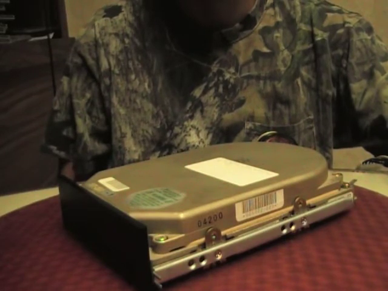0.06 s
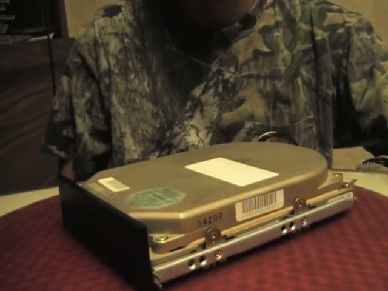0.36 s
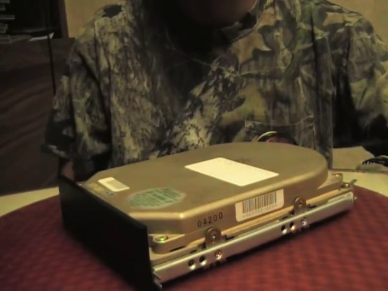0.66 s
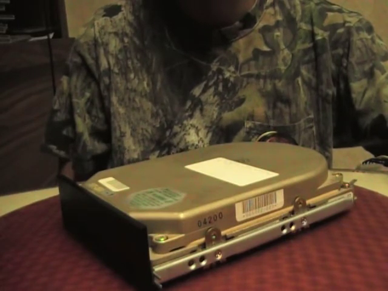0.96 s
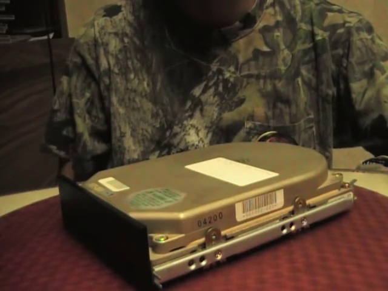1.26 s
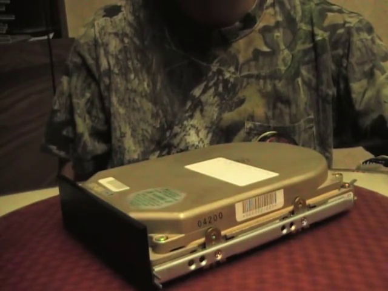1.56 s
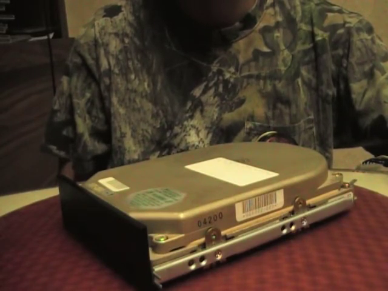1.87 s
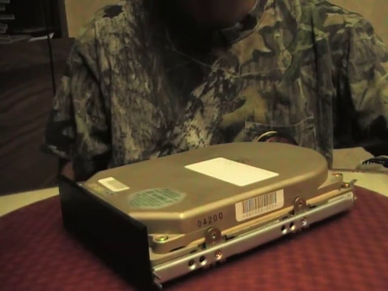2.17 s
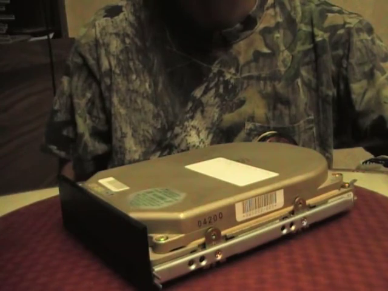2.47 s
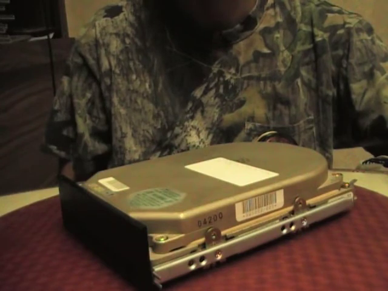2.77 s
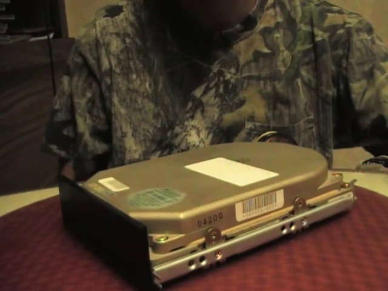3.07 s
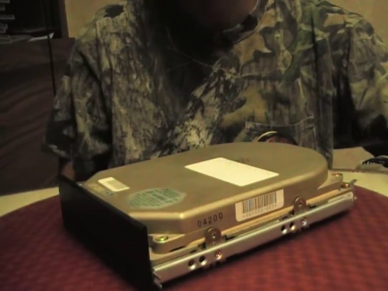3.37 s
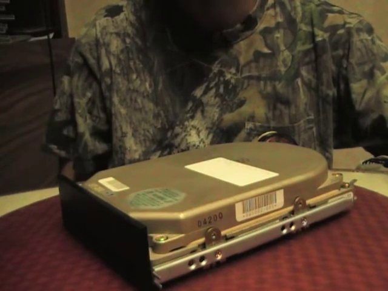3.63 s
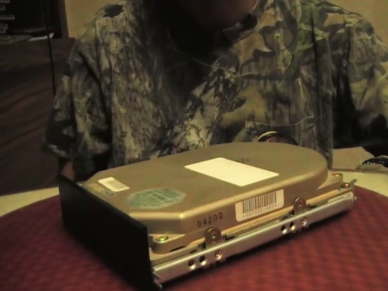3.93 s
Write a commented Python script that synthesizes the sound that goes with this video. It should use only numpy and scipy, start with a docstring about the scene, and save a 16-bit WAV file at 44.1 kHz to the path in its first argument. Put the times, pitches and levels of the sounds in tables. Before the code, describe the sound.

Close up, an old hard drive spins with a steady hum, thin bearing whine and fan noise. Its heads sweep several times with hollow knocks, then settle into fast, regular back-and-forth clicking with small whistles and rattles.

```python
"""A humming spindle, singing bearings and a rush of fan air: an old hard drive runs close by on a table. Almost
at once its stepper motor swings the heads through a few long sweeps, then shuttles them in and out in short
seeks. Each move jolts the chassis into ringing, while the motor whines and whistles, the arm rattles and the
coils sizzle. Long outward sweeps also make the arm itself thud."""
import sys
import numpy as np
from scipy import signal
from scipy.fft import rfft, irfft, next_fast_len
from scipy.io import wavfile
from scipy.ndimage import map_coordinates

SR = 44100
rng = np.random.default_rng(int(sys.argv[2]) if len(sys.argv) > 2 else 0)


def master_out(mix):
    """Clip the mix to full scale and print it as 16-bit PCM to the path in sys.argv[1]."""
    frames = np.transpose(np.atleast_2d(mix))
    ceiling = np.clip(frames, -1, 1)
    pcm = np.round(ceiling * 32767).astype(np.int16)
    wavfile.write(sys.argv[1], SR, pcm)


N = 176400


def amp(db):
    """Decibels to gain."""
    return 10 ** (np.asarray(db) / 20)


def along(points, hz):
    """Read a curve of (Hz, value) points on a log frequency axis."""
    freqs, values = np.transpose(points)
    return np.interp(np.log(hz + 1), np.log(freqs + 1), values)


def wobble(rate):
    """A smooth random curve, rate knots a second."""
    return map_coordinates(rng.standard_normal(int(N * rate / SR) + 4), [np.arange(N) * rate / SR])


def filtered(x, response):
    """EQ x with a gain that is a function of Hz."""
    size = next_fast_len(N + SR // 2)
    return irfft(rfft(x, size) * response(np.fft.rfftfreq(size, 1 / SR)), size)[..., :N]


def add(track, start, sound):
    """Mix a sound into a track at start seconds."""
    part = track[..., max(round(start * SR), 0):][..., :sound.shape[-1]]
    part += sound[..., :part.shape[-1]]


# Low hum, singing ball bearings and high motor whine. Each row: pitch in Hz, rms level in dB.
SPINDLE_HUM = [(120.1, -72), (240.2, -39.5), (360.4, -54)]
BEARING_TONES = [(1846, -60), (1879, -62), (2374, -63), (2735, -61), (2848, -60), (3316, -60), (3424, -52),
                 (3634, -63), (3741, -63), (4124, -67)]
MOTOR_WHINE = [(5766, -64), (5954, -66), (6002, -65), (6245, -58), (6304, -61), (6487, -60), (6724, -71),
               (6966, -69), (7208, -70), (7687, -75), (7865, -77), (8269, -72), (8409, -73)]
# Balls pass a flaw in the race, and the turning cage sways that rate.
# Each row: multiple of BALL_PASS_HZ, rms level in dB, phase sway in radians.
RACE_FLAW_TONES = [(4, -51, .2), (5, -55, .3), (6, -55, .8), (7, -47, 1.4), (8, -54, 1.9), (9, -52, 2.2),
                   (10, -56, .9), (11, -66, 1.2)]
BALL_PASS_HZ, CAGE_HZ = 425.3, 21.7
OVERSPEED, SETTLE_S, SPEED_WANDER = .008, .3, .00015
TONE_WAVER_DB, TONE_WIDTH = .8, .22


def spindle():
    """Hum, bearings and motor whine all follow one shaft as it settles from a slight overshoot."""
    speed = 1 + OVERSPEED * np.exp(-np.arange(N) / SR / SETTLE_S) + SPEED_WANDER * wobble(5)
    phase_per_hz = 2 * np.pi * np.cumsum(speed) / SR
    steady = [(hz, db, 0) for hz, db in [*SPINDLE_HUM, *BEARING_TONES, *MOTOR_WHINE]]
    swaying = [(k * BALL_PASS_HZ, db, sway) for k, db, sway in RACE_FLAW_TONES]
    out = np.zeros((2, N))
    for hz, db, sway in steady + swaying:
        offset, cage_offset, side_offset = rng.uniform(0, 2 * np.pi, 3)
        phase = hz * phase_per_hz + offset + sway * np.sin(CAGE_HZ * phase_per_hz + cage_offset)
        width = TONE_WIDTH * along([(3000, .25), (4000, 1.2)], hz)  # high tones spread wider
        side = width * np.sin(phase + side_offset)
        level = np.sqrt(2) * amp(db + TONE_WAVER_DB * wobble(9))
        out += level * (np.sin(phase) + np.array([side, -side]))
    return out


# Stereo image of every noise layer. Each row: frequency in Hz, left-right correlation.
NOISE_IMAGE = [(30, .8), (120, .97), (1000, .94), (2500, .98), (4000, .8), (12000, .8)]
CASE_SPACING_HZ, CASE_RIPPLE_DB = 45, 4


def case_noise(spectrum):
    """Coloured stereo noise of rms 1, its highs rippled by the case's many small resonances."""
    knots = rng.standard_normal(SR // 16)

    def mid_side_eq(hz):
        ripple_db = CASE_RIPPLE_DB * map_coordinates(knots, [hz / CASE_SPACING_HZ])
        ripple_db *= along([(900, 0), (1800, 1)], hz)
        spread = np.arccos(np.clip(along(NOISE_IMAGE, hz), -1, 1)) / 2
        return amp(along(spectrum, hz) + ripple_db) * [np.cos(spread), np.sin(spread)]

    mid, side = filtered(rng.standard_normal((2, N)), mid_side_eq)
    pair = np.array([mid + side, mid - side])
    return pair / pair.std()


# Colour of the rushing air. Each row: frequency in Hz, relative level in dB.
AIR_EQ = [(25, -22), (55, -22), (80, -12), (105, -5), (170, 1.5), (260, -2), (400, -4), (470, -1),
          (560, -5), (720, -13), (950, -5), (1170, -15), (1400, -10), (2000, -20.5), (2800, -12),
          (3800, -21), (5200, -27), (6200, -24), (7500, -30), (10300, -27.5), (12200, -32), (13300, -45),
          (15500, -58)]


def fan_air(level_db=-40.5):
    """Fan and platters stir up a steady bed of air."""
    return amp(level_db) * case_noise(AIR_EQ)


# Cues for the long sweeps. Each row: start in seconds, direction (0 out, 1 in).
SWEEP_CUES = [(.012, 0), (.099, 1), (.1785, 0), (.265, 1), (.3445, 0), (.4315, 1), (.511, 0)]
# Cues for the short round trips. Each row: inward start in seconds, outward start in seconds.
SHUTTLE_CUES = [(0.599, 0.6373), (0.6878, 0.7438), (0.7927, 0.849), (0.8941, 0.9454), (0.9914, 1.045),
                (1.0872, 1.1383), (1.1821, 1.2337), (1.2733, 1.3239), (1.3651, 1.4164), (1.4553, 1.5016),
                (1.5405, 1.5916), (1.6279, 1.674), (1.7126, 1.7612), (1.7973, 1.843), (1.8814, 1.9278),
                (1.9635, 2.0047), (2.0407, 2.0869), (2.1225, 2.1635), (2.2006, 2.2465), (2.282, 2.3227),
                (2.36, 2.4056), (2.4431, 2.4835), (2.5208, 2.5638), (2.6015, 2.6418), (2.6791, 2.72),
                (2.7598, 2.7999), (2.8393, 2.8816), (2.9238, 2.9658), (3.0075, 3.0497), (3.0923, 3.1366),
                (3.1784, 3.2228), (3.2655, 3.3099), (3.3518, 3.3963), (3.4412, 3.4875), (3.5315, 3.576),
                (3.6231, 3.6718), (3.718, 3.7644), (3.812, 3.8609), (3.9073, 3.9561)]
# The arm's four moves. Each lists: seconds from the cue to full speed, to braking, to the stop
# and to the whistle's peak, then the level in dB of each of the three whine harmonics.
SWEEP_OUT = (.0033, .0495, .0542, .029, -50, -45.5, -62)
SWEEP_IN = (.0047, .0495, .0542, .037, -47, -58, -64)
SEEK_IN = (.00598, .01451, .01875, .0115, -50, -50, -64)
SEEK_OUT = (.00671, .01439, .0203, .0145, -45.5, -53, -62)
# Jolts as the arm starts, reaches speed, brakes and stops. Each row: delay in seconds, strength in dB.
SWEEP_OUT_JOLTS = [(.001, 7.5), (.0088, -1), (.0505, 3.5), (.0583, -3)]
SWEEP_IN_JOLTS = [(.002, 7.5), (.0098, 0), (.0505, 1.5), (.0583, -5)]
SEEK_IN_JOLTS = [(.00068, 6.9), (.01019, -8.8), (.01514, 3.3), (.02053, -4.9)]
SEEK_OUT_JOLTS = [(.00038, 6.9), (.00824, -12.6), (.01486, 3.5), (.01706, -6)]


def seeks():
    """Every trip of the head arm as (start in seconds, move, jolts)."""
    trips = [(start, SWEEP_IN, SWEEP_IN_JOLTS) if inward else (start, SWEEP_OUT, SWEEP_OUT_JOLTS)
             for start, inward in SWEEP_CUES]
    trips += [(start, SEEK_IN, SEEK_IN_JOLTS) for start, _ in SHUTTLE_CUES]
    trips += [(start, SEEK_OUT, SEEK_OUT_JOLTS) for _, start in SHUTTLE_CUES]
    return trips


def arm_thud(hz=478, gain_db=-22, rise_s=.004, t60_s=.06):
    """The arm gives a hollow knock of its own as it sets off on a long outward sweep."""
    out, t = np.zeros(N), np.arange(SR // 5) / SR
    attack = 1 - np.exp(-(t / rise_s) ** 2)
    knock = -np.sin(2 * np.pi * hz * t) * attack * amp(-60 * t / t60_s)
    for start, inward in SWEEP_CUES:
        if not inward:
            add(out, start, amp(gain_db) * knock)
    return out


# Colours of the arm's rattle and the coils' sizzle. Each row: frequency in Hz, relative level in dB.
RATTLE_EQ = [(600, -30), (850, -5), (1030, 0), (1170, -12), (1300, -4), (1530, 0), (1700, -15), (2800, -7),
             (3700, -9), (4300, -12), (5200, -24), (10000, -45)]
SIZZLE_EQ = [(4200, -25), (4850, -3), (5500, -11), (6500, -25), (9200, -16), (10100, -6), (11000, -7),
             (11650, 1), (12150, 0), (12600, -8), (13200, -20), (14000, -17), (15500, -32)]
RATTLE_DB, RATTLE_RELEASE_S, SIZZLE_DB = -46.5, .008, -50
STEP_HZ, WHISTLE_HZ = 912, 11845  # both at full speed
WHINE_HARMONICS = (3, 4, 6)
WHISTLE_GAIN_DB, WHISTLE_SAG, WHISTLE_SPREAD_RAD = -41.7, .025, .3
SWELL_FLOOR, SWELL_WIDTH = .28, .16  # width is a share of the move's length


def stepper():
    """The motor whines and whistles with the arm's speed, rattles the arm and sizzles on speed ramps."""
    tones, moving, ramping = np.zeros((2, N)), np.zeros(N), np.zeros(N)
    t = np.arange(SR // 10) / SR
    for start, (at_speed, braking, stopped, peak, *whine_db), _ in seeks():
        speed = np.clip(np.minimum(t / at_speed, (stopped - t) / (stopped - braking)), 0, 1)
        step_phase = 2 * np.pi * STEP_HZ * np.cumsum(speed) / SR
        whine = speed * sum(amp(db) * np.sin(k * step_phase) for k, db in zip(WHINE_HARMONICS, whine_db))
        swell = SWELL_FLOOR + np.exp(-.5 * ((t - peak) / (SWELL_WIDTH * stopped)) ** 2)
        whistle_hz = WHISTLE_HZ * (1 - WHISTLE_SAG * (1 - speed))
        phase = 2 * np.pi * np.cumsum(whistle_hz) / SR + rng.uniform(0, 2 * np.pi)
        whistle = speed * swell * np.sin([phase + WHISTLE_SPREAD_RAD, phase - WHISTLE_SPREAD_RAD])
        add(tones, start, whine + amp(WHISTLE_GAIN_DB) * whistle)
        add(moving, start, np.exp(-np.maximum(t - stopped, 0) / RATTLE_RELEASE_S))
        add(ramping, start, 2 * np.sqrt(speed * (1 - speed)))  # peaks at half speed
    rattle = amp(RATTLE_DB) * moving * case_noise(RATTLE_EQ)
    sizzle = amp(SIZZLE_DB) * ramping * case_noise(SIZZLE_EQ)
    return tones + rattle + sizzle


# The chassis ring, whose close pairs swell before they fade, and the arm's bright tick.
# Each row: pitch in Hz, gain in dB, seconds to fade by 60 dB.
CHASSIS_MODES = [(487, -35.6, .074), (612, -33.5, .13), (646, -35.7, .095), (783, -46, .134),
                 (849, -49.8, .186), (904, -35.4, .029), (985, -23.4, .02), (1036, -20.5, .057),
                 (1038, -23.6, .096), (1107, -58, .2), (1301, -25, .063), (1300, -27.2, .092),
                 (1377, -50, .092), (1527, -34, .075), (1519, -37.4, .115), (1745, -58, .2)]
ARM_MODES = [(1910, -59, .06), (2774, -54, .06), (3080, -48, .014), (3750, -54, .03), (4850, -56, .025)]
JOLT_SCATTER_DB, JOLT_JITTER_S, RING_UP_CYCLES = .4, .00004, .1
LOW_CUT_HZ = 170  # the small chassis gives off little below this


def chassis_jolts():
    """Each change of the arm's acceleration is a jolt: the chassis rings and the arm ticks."""
    impulses, t = np.zeros(N), np.arange(SR // 5) / SR
    for start, _, jolts in seeks():
        for (delay, db), sign in zip(jolts, (1, -1, -1, 1)):
            jitter_s, scatter_db = rng.standard_normal(2) * [JOLT_JITTER_S, JOLT_SCATTER_DB]
            add(impulses, start + delay + jitter_s, sign * amp([db + scatter_db]))
    ring = np.zeros_like(t)
    for k, (hz, db, t60) in enumerate([*CHASSIS_MODES, *ARM_MODES]):
        envelope = (1 - np.exp(-hz * t / RING_UP_CYCLES)) * amp(db - 60 * t / t60)
        ring += (-1) ** k * envelope * np.sin(2 * np.pi * hz * t)  # neighbours start in opposite phase
    knocks = signal.fftconvolve(impulses, ring)[:N]
    return filtered(knocks, lambda hz: hz ** 4 / (hz ** 4 + LOW_CUT_HZ ** 4))


def scene(left_db=-.2, right_db=.2):
    """The seeks over the bed of spindle and air, leaning a touch to the right."""
    mix = chassis_jolts() + arm_thud() + stepper() + spindle() + fan_air()
    return mix * amp([[left_db], [right_db]])


HIGH_CUT_HZ = 15750


def record(dry):
    """A brick-wall high cut trims the very top of the mix."""
    return filtered(dry, lambda hz: hz < HIGH_CUT_HZ)


dry = scene()
out = record(dry)
master_out(out)
```